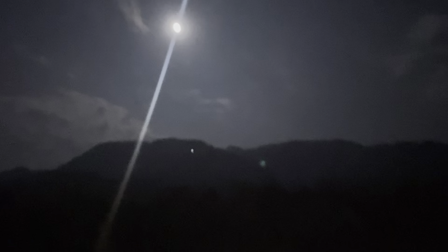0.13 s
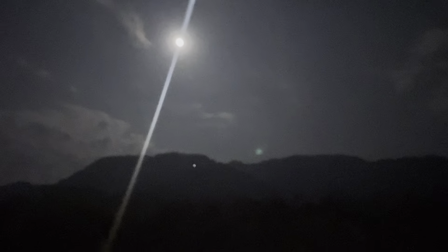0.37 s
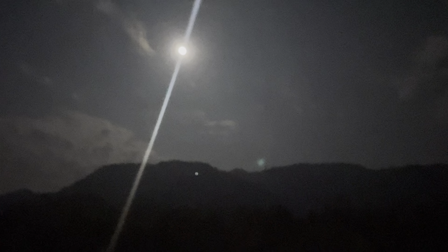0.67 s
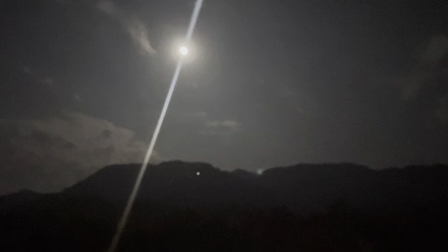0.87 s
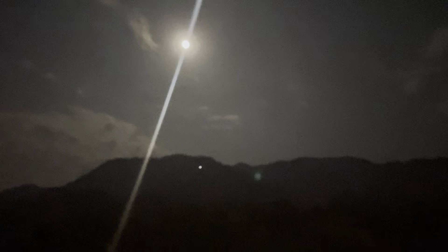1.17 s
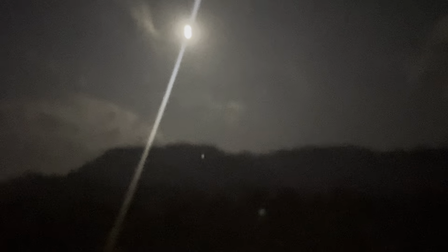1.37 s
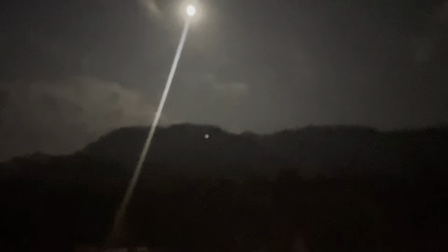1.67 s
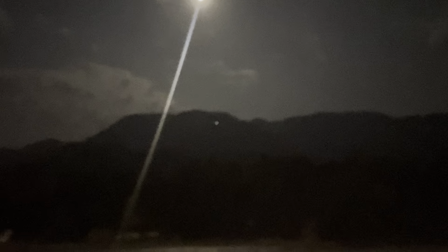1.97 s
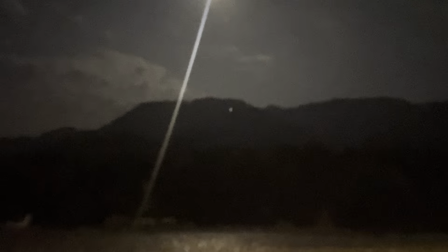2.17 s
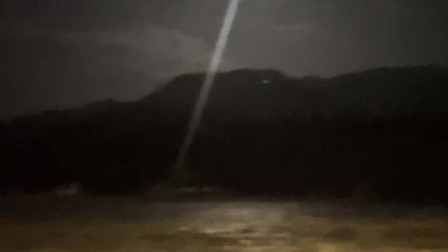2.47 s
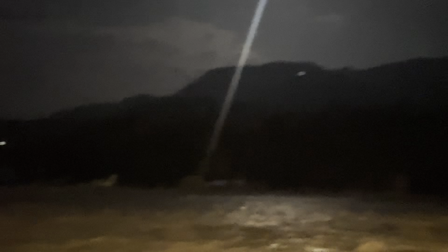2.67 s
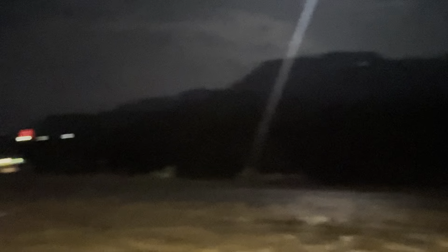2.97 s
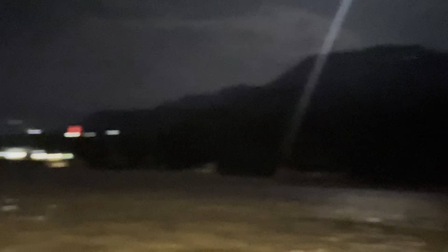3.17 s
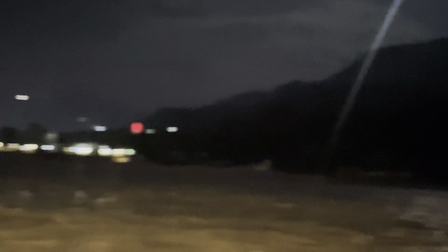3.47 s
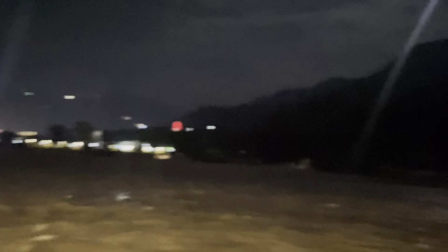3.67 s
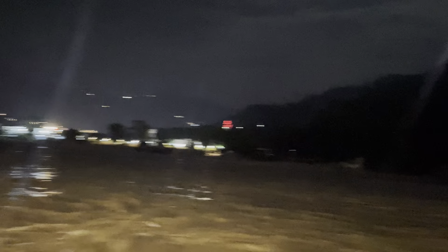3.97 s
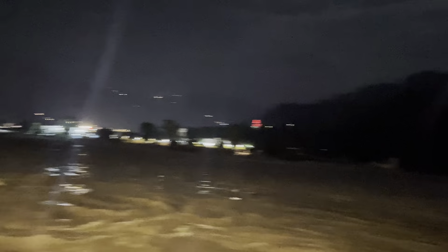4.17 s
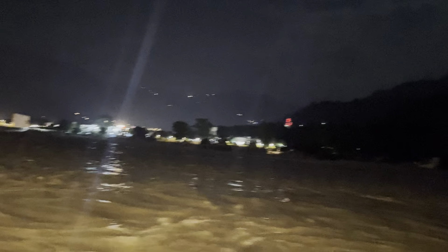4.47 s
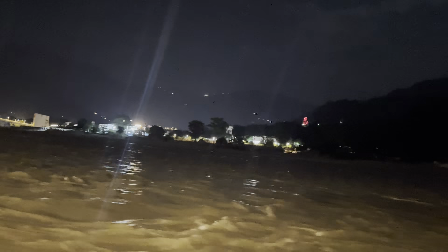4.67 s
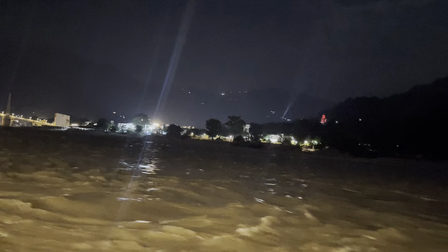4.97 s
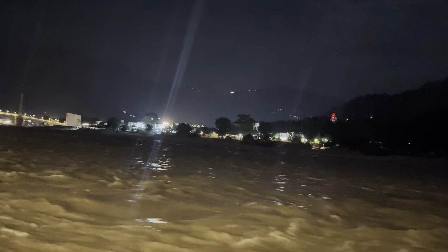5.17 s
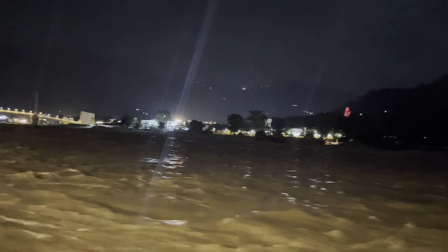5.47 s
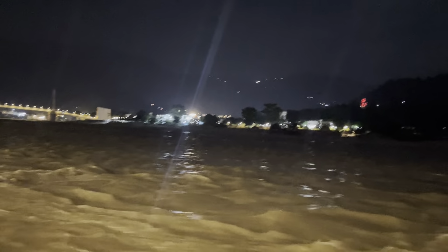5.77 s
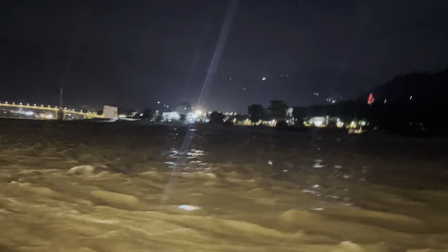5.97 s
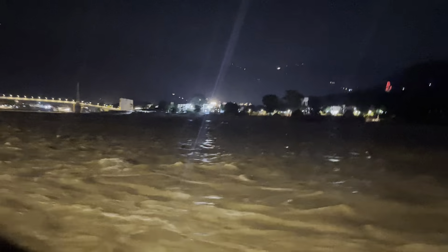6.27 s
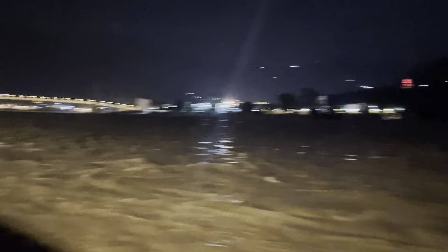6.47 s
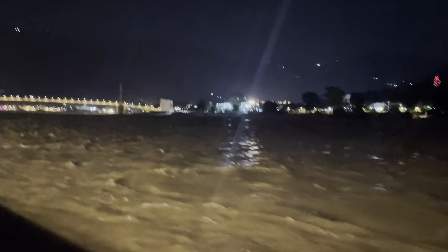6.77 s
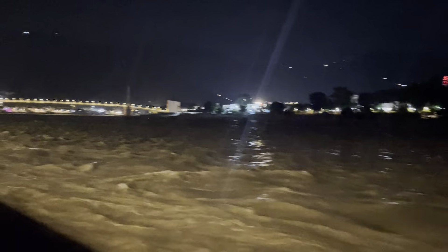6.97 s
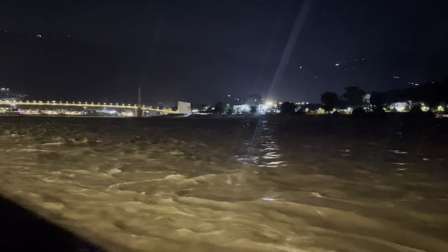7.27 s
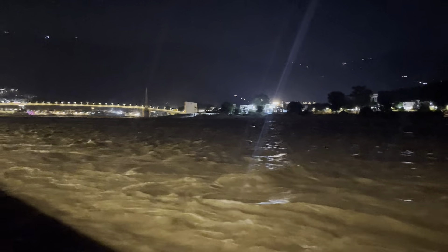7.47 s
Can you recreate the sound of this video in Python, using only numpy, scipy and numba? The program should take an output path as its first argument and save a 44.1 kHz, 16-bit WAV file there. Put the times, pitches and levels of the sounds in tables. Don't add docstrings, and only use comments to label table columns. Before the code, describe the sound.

A fast, swollen river rushes past a bank at night, heard close and outdoors on a handheld stereo microphone. From 0 s a dense, unbroken roar carries lapping, wash and fine hissing spray, uneven from moment to moment. Low wind gusts throb and flutter on the microphone, growing from 0.8 s, with the hardest thump near 1.3 s and more buffets until about 2 s. The water surges around 1.1 to 1.4 s. Small bubbles plop and droplets tick on either side throughout. Between 2.5 and 4 s the microphone turns upstream, the dull right side brightens, and milder gusts pass near 3 and 4 s. The river eases slightly toward 5 s, then bubbles cluster and waves splash at 5.6 to 6 s, with another surge around 6.3 to 6.5 s. Light wind puffs continue as the slightly quieter rush runs on to the end at 7.6 s, never stopping.

```python
import sys
import numpy as np
from scipy import signal
from scipy.fft import rfft, irfft, next_fast_len
from scipy.io import wavfile
from scipy.ndimage import uniform_filter1d, map_coordinates
from numba import njit

SR = 44100
rng = np.random.default_rng(int(sys.argv[2]) if len(sys.argv) > 2 else 0)


def volts(x):
    e = np.asarray(x, float) / 20
    return 10 ** e


def unload_wav(signal):
    wavfile.write(
        sys.argv[1],
        SR,
        np.round(np.clip(np.atleast_2d(signal).T, -1, 1) * 32767).astype(np.int16),
    )


N = 336042
SIZE = next_fast_len(N)
HZ = np.maximum(np.arange(SIZE // 2 + 1) * SR / SIZE, 1)
T = np.arange(N) / SR

# (time [s], left-port lag of bank bass [samples], of bank treble [samples],
# right-port shadow [dB], direct share from ahead [0-1], likeness of ports [0-1])
PHONE_TURN = [
    (0, 24.5, 8.6, 5.3, 0.5, 0.74),
    (1, 24.4, 8.4, 4.8, 0.76, 0.67),
    (2, 23.6, 9.7, 7.4, 0.76, 0.76),
    (2.7, 23.9, 9.4, 2.6, 0.39, 0.91),
    (3.2, 25.5, 12, 1.4, 0.27, 0.88),
    (4, 25, 13.1, 1.1, 0.32, 0.67),
    (5.5, 20.5, 14.1, 0.52, 0.14, 0.81),
    (6.3, 22.5, 14.5, 0.17, 0.075, 0.85),
    (7.62, 21.6, 15.8, 0.091, 0.31, 0.87),
]
# (time [s], left peak [dB], pitch [Hz], right peak [dB])
NEAR_BUBBLES = [(0.086, -39, 846, -29), (0.352, -43, 1046, -27.5), (0.591, -25, 2590, -44),
                (0.923, -29, 3432, -48), (1.413, -35, 1090, -23), (1.438, -27, 1130, -21),
                (3.29, -42, 1808, -23), (3.293, -36, 2870, -34), (3.454, -46, 3730, -43),
                (3.707, -37, 1180, -30), (3.916, -37, 2153, -33), (4.985, -35, 765, -29),
                (5.052, -36.2, 2540, -33), (5.163, -27, 1290, -24), (5.668, -32, 910, -31),
                (5.785, -38, 1705, -32), (5.839, -45, 1000, -37), (5.852, -33, 1460, -30),
                (5.871, -30, 1900, -25), (5.92, -35, 1500, -25), (7.18, -50, 1690, -36.3),
                (1.48, -36, 990, -27),
    (1.634, -25, 2650, -38),
    (2.049, -35, 1090, -28),
    (3.035, -33, 1000, -32),
    (3.053, -30, 1094, -31),
    (5.6, -22, 1380, -22),
    (5.805, -44, 2120, -30),
    (5.895, -32, 3280, -31),
    (5.939, -32, 1290, -26.5),
]
# (time [s], left peak [dB], pitch [Hz], right peak [dB])
DROPLETS = [(0.149, -28, 5185, -50), (0.403, -26.5, 11500, -37), (0.725, -25, 4548, -39),
            (0.922, -29, 3989, -29), (1.051, -32, 8757, -37), (1.594, -32, 7470, -35),
            (2.02, -30, 6700, -36), (2.498, -34.6, 8757, -34.4), (2.997, -34, 5185, -39),
            (3.096, -36, 12900, -33), (3.459, -28, 3989, -28), (4.476, -31, 8757, -31),
            (5.538, -35, 8757, -28), (5.982, -37, 11381, -36), (6.389, -28, 5185, -25),
            (6.676, -39, 12975, -54), (6.967, -36, 11000, -38), (7.213, -35, 7682, -40)]
# (frequency [Hz], level per Hz [dB])
WATER_COLOUR = [(40, -1.5), (100, -3), (250, 0.5), (500, -1), (800, -7.5), (1100, -10.5), (1800, -15),
                (3000, -17), (4700, -21.5), (6000, -23.5), (8500, -27.5), (11000, -32.5), (13500, -35.5),
                (15500, -32)]
# (frequency [Hz], gain [dB])
RIGHT_COLOUR = [(100, 1), (300, -1.5), (600, -0.5), (1300, 1), (2200, 1), (4000, -.5), (6400, 2)]
# (frequency [Hz], factor [1])
LIKE_FACTOR = [(100, 0.89), (300, 1.18), (700, 0.84), (1200, 1.02), (2000, 1.72), (3500, 0.57), (5000, 0.9),
               (6000, 0.98)]
# (frequency [Hz], factor [1])
AHEAD_FACTOR = [(300, 0.85), (800, 0.71), (1500, 0.78), (2200, 1.33), (3000, 0.64), (4500, 1.28),
                (6000, 1.53)]
# (frequency [Hz], gain [dB])
UPSTREAM_COLOUR = [(150, -1), (270, 7), (400, -5.5), (530, -9.5), (780, 6), (1000, 2.5), (1400, 0.5)]
# (time [s], level [dB])
CHURN_DB = [(0, -44), (.27, -44.5), (.52, -45.5), (1.0, -45.5), (1.09, -41), (1.27, -40.5), (1.75, -45),
            (2.45, -43.5), (3.3, -47), (3.75, -46), (4.3, -49), (4.5, -46), (5.2, -50), (5.8, -46.5),
            (6.36, -47), (6.47, -44), (7.05, -52), (7.62, -50.5)]
# (share of churn followed [0-1], gain per turn [dB/sample], own wander [dB])
WATER_LAYERS = [
    (.1, 0.28, 0.8),
    (.4, 0.3, 1.24),
    (0.752, 0.04, .5),
    (.95, -0.06, 1.1),
]
# (time [s], swell [dB], centre [Hz])
BREAKING_WAVES = [(.09, 1, 1100), (.4, -1, 5000), (.76, 3, 5000), (1.22, 1.5, 900), (1.43, 3, 1000),
                  (2.05, 1, 2000), (2.15, -3.5, 2500), (3.03, 1.5, 1100), (3.15, -3, 2500), (3.35, 0, 400),
                  (3.47, 2.5, 6000), (3.62, -1.5, 900), (3.72, 1, 350), (4.05, -2.5, 1200), (4.28, -3, 350),
                  (4.56, 0, 1100), (4.75, 1, 330), (5.17, 0, 1100), (5.7, 1.5, 300), (5.87, 4.5, 1730),
                  (5.9, 2.5, 300), (6.27, 3.5, 2410), (6.27, 3.5, 330), (6.39, 3, 450), (6.53, -2.5, 2500),
                  (6.6, 1.5, 280), (6.93, 2, 330), (7.22, 1.5, 350), (7.43, -1.5, 500), (7.6, 1.5, 290)]
# (time [s], eddy level [dB], eddy pitch [Hz], deep buffet level [dB])
STRONG_GUSTS = [(.06, -34.5, 109, -50), (.26, -40, 83, -45), (.81, -25.5, 110, -36), (.99, -22.5, 96, -39),
                (1.12, -30, 101, -37), (1.28, -17.5, 84, -32), (1.39, -34, 106, -37),
                (1.52, -27, 91, -29.5), (1.61, -34, 107, -36), (1.71, -31, 103, -36),
                (1.81, -23.5, 94, -35), (1.9, -29, 91, -45), (2.12, -30, 117, -38), (2.31, -40, 89, -39.5),
                (2.65, -33.5, 98, -37), (2.81, -39, 113, -50), (2.97, -27, 78, -35),
                (3.07, -32, 81.4, -36.5), (3.23, -34.5, 78, -34), (3.35, -31, 78, -41), (3.6, -36, 94, -41),
                (3.97, -28, 91, -34), (4.05, -32, 74, -35), (4.14, -36, 68, -39), (4.23, -45, 80, -37.5),
                (4.76, -38, 109, -44), (5.15, -37, 74.5, -39), (5.61, -28, 82, -42), (5.75, -34, 103, -48),
                (6.42, -47, 84.5, -39)]
# (time [s], eddy level [dB], eddy pitch [Hz])
LIGHT_PUFFS = [(.63, -45, 106), (2.45, -36.5, 91), (3.45, -38, 85), (3.52, -46, 90), (3.68, -47, 90),
               (3.79, -39, 106), (4.39, -32.5, 108), (4.57, -29, 93), (4.97, -32, 108), (5.07, -38, 100),
               (5.26, -46, 106), (5.4, -36.5, 108), (5.85, -34.5, 120), (6.02, -33.5, 117),
               (6.13, -46, 126), (6.2, -47, 115), (6.31, -43, 126), (6.53, -42, 108), (6.61, -35.5, 86),
               (6.7, -45, 110), (6.82, -34, 109), (7.02, -33, 104), (7.12, -36, 90), (7.25, -38, 100),
               (7.33, -38, 93), (7.48, -33.5, 100)]


def on_time(table):
    s, *columns = np.transpose(table)
    return [np.interp(T, s, column) for column in columns]


def on_hz(table, hz):
    table_hz, value = np.transpose(table)
    return np.interp(np.log(hz), np.log(table_hz), value)


def shape(x, gain):
    return irfft(rfft(x, SIZE) * gain, SIZE)[..., :N]


def unit(x):
    return x / np.sqrt(np.mean(x ** 2))


def walk(rate_hz):
    hold = int(SR / rate_hz)
    held = np.repeat(rng.standard_normal(N // 256), hold)[:N]
    return 0.72 * uniform_filter1d(uniform_filter1d(held, hold), hold)


def delay(x, lag_samples):
    return map_coordinates(x, [np.arange(N) - lag_samples], order=3, mode="nearest")


def gusting(s, peak_db, rise_db_s, fall_db_s, lull_db):
    t = T[::64]
    late_s = t - s[:, None]
    gust_db = peak_db[:, None] + np.minimum(rise_db_s * late_s, -fall_db_s * late_s)
    power = volts(2 * gust_db).sum(axis=0) + volts(2 * lull_db)
    return np.interp(T, t, 10 * np.log10(power))


def air():
    puffs = [(s, eddy_db, hz, eddy_db - 18.5) for s, eddy_db, hz in LIGHT_PUFFS]
    s, eddy_db, hz, deep_db = np.transpose(sorted(STRONG_GUSTS + puffs))
    eddy_level_db = gusting(s, eddy_db, rise_db_s=205, fall_db_s=212, lull_db=-46)
    deep_level_db = gusting(s, deep_db, rise_db_s=106, fall_db_s=130, lull_db=-52)
    return eddy_level_db, np.interp(T, s, hz), deep_level_db


@njit
def resonate(x, hz, q):
    y, band, low = np.empty(len(x)), 0., 0.
    for i in range(len(x)):
        g = np.tan(np.pi * hz[i] / SR)
        v = (band + g * (x[i] - low)) / (1 + g * (g + 1 / q))
        band = 2 * v - band
        low += 2 * g * v
        y[i] = v / q
    return y


def eddy(hz, q):
    x = resonate(resonate(rng.standard_normal(N), hz, q), hz, q)
    swing = np.sqrt(uniform_filter1d(x ** 2, 900)) + 0.29 * x.std()
    return unit(x / swing ** 0.56)


def wind():
    eddy_db, hz, deep_db = air()
    own = np.array([eddy(0.77 * hz, 0.57), eddy(0.78 * hz, 0.99)])
    eddy_gain = volts(eddy_db - 1.5) * np.clip((eddy_db + 57.5) / 9, 0, 1)
    deep_gain = volts(deep_db + 3.0) * np.clip((deep_db + 56.0) / 9, 0, 1)
    throb = eddy(0.92 * hz, 1.25) + 0.29 * eddy(1.78 * hz, 1.27) + 0.28 * own
    buffet = eddy(52 + 0 * hz, 1.26) + 0.56 * own
    return eddy_gain * throb + deep_gain * buffet


@njit
def bubbles(start, hz, cycles, size, glide):
    out = np.zeros(N)
    for k in range(len(start)):
        life = min(int(cycles[k] * SR / hz[k]), N - start[k])
        phase = 0.
        for i in range(life):
            phase += min(2 * np.pi * hz[k] / SR * (1 + glide * i / life), 3.)
            fade = np.exp(-5 * i / life) * min(1., (i + 1) * 6 / life) ** 2 * 2
            out[start[k] + i] += size[k] * np.sin(phase) * fade
    return out


def drops(table, cycles, glide, trim_db):
    s, left_db, hz, right_db = np.transpose(table)
    start = (s * SR).astype(np.int64)
    left, right = (bubbles(start, hz * 0.9, cycles + 0 * hz, volts(db + trim_db), glide)
                   for db in (left_db, right_db))
    treble_lag = on_time(PHONE_TURN)[1]
    return np.array([delay(left, treble_lag), right])


def plops():
    snap_table = [(s + 0.0004, left_db + 3, 14500, right_db - 7) for s, left_db, _, right_db in DROPLETS]
    rings = drops(NEAR_BUBBLES, cycles=29.7, glide=0.386, trim_db=1.34)
    ticks = drops(DROPLETS, cycles=18, glide=0.4, trim_db=1.5)
    snaps = drops(snap_table, cycles=4.9, glide=0.1, trim_db=0)
    return rings + ticks + snaps


def froth(count, lo_hz, hi_hz, cycles, spread_db):
    u = rng.random((count, 4)).T
    start = (u[0] * (N - 1)).astype(np.int64)
    hz = lo_hz + (hi_hz - lo_hz) * u[1]
    size = volts(np.minimum(-spread_db * np.log(1 - u[2]), 13))
    return unit(bubbles(start, hz, cycles * (0.5 + u[3]), size, 0.17))


def swells():
    churn, turn = on_time(CHURN_DB)[0], on_time(PHONE_TURN)[1]
    churn, turn = churn - churn.mean(), turn - turn.mean()
    return [share * churn + tilt_db * turn + own_db * walk(rate_hz=9)
            for share, tilt_db, own_db in WATER_LAYERS]


def breakers(hz):
    s, db, centre_hz = np.transpose(BREAKING_WAVES)
    t = T[::256]
    width_s, width_octaves = 0.095, 1
    reach_db = db * np.exp(-(np.log2(hz / centre_hz) / width_octaves) ** 2)
    return np.interp(T, t, reach_db @ np.exp(-((t - s[:, None]) / width_s) ** 2))


def river():
    layers_db = swells()
    *lags, shadow_db, ahead, alike = on_time(PHONE_TURN)
    hiss = unit(shape(rng.standard_normal((4, N)), HZ < 20000))
    for source in hiss[:2]:
        source += volts(-14.5) * froth(count=1500, lo_hz=616, hi_hz=2936, cycles=17.2, spread_db=2.5)
        source += volts(-6.5) * froth(count=7000, lo_hz=3150, hi_hz=15900, cycles=9.2, spread_db=4.0)
    spectra = rfft(hiss, SIZE) * volts(on_hz(WATER_COLOUR, HZ))
    surges = [walk(24) for _ in range(7)]
    splash = walk(45)
    upstream = np.clip(0.5 - shadow_db / 3, 0, 1)
    bank, out = np.zeros((2, N)), np.zeros((2, N))
    for k, hz in enumerate(40 * 2 ** (np.arange(27) / 3)):
        window = np.cos(np.pi / 2 * np.clip(3 * np.log2(HZ / hz), -1, 1)) ** 2
        place = np.clip(np.log2(hz / 350) / 1.6, 0, 3)
        db = sum(np.clip(1 - abs(place - p), 0, 1) * level for p, level in enumerate(layers_db))
        db = db * min(hz / 250, 1)
        db += breakers(hz) + 1.2 * surges[k // 4] + 1.7 * walk(32)
        db += 1.35 * place / 3 * splash
        db += on_hz(UPSTREAM_COLOUR, hz) * upstream
        like = np.clip(alike * on_hz(LIKE_FACTOR, hz), 0, 0.98)
        front = like * np.clip(ahead * on_hz(AHEAD_FACTOR, hz), 0, 1)
        shares = np.array([front, like - front, 1 - like, 1 - like])
        bands = irfft(spectra * window, SIZE)[:, :N]
        stream, near, *around = bands * volts(db) * np.sqrt(shares)
        right_db = on_hz(RIGHT_COLOUR, hz) - shadow_db * np.clip(1.55 * place - 2.1, 0, 1)
        bank[int(hz > 1100)] += near
        out += [stream + around[0], volts(right_db) * (stream + near + around[1])]
    out[0] += sum(delay(part, lag) for part, lag in zip(bank, lags))
    return volts(-32.5) * unit(out)


def scene():
    return wind() + plops() + river()


def low_pass(x):
    return signal.sosfilt(signal.butter(12, 15690, fs=SR, output="sos"), x)


def record(dry):
    bass_cut = 1 / np.sqrt(1 + (55 / HZ) ** 4)
    top_cut = 1 / np.sqrt(1 + (HZ / 15900) ** 80)
    x = shape(dry, bass_cut * top_cut)
    change = -np.roll(x[0], -6) - x[1]
    low_split = shape(change, 1 / (1 + (6400 / HZ) ** 46.0))
    high_split = shape(change, 1 / (1 + (6750 / HZ) ** 8.1))
    shadowed = np.clip(on_time(PHONE_TURN)[2] / 2.0, 0, 1)
    x[1] += shadowed * low_split + (1 - shadowed) * high_split
    return low_pass(x)


dry = scene()
out = record(dry)
unload_wav(out)
```